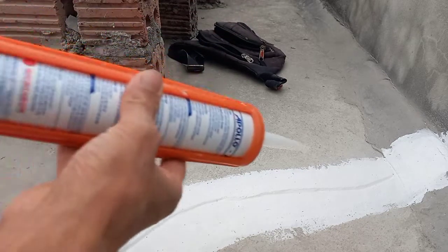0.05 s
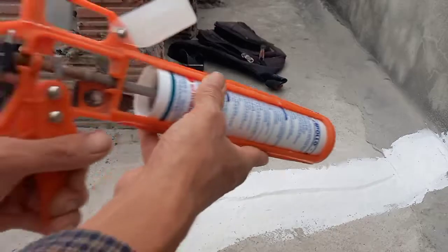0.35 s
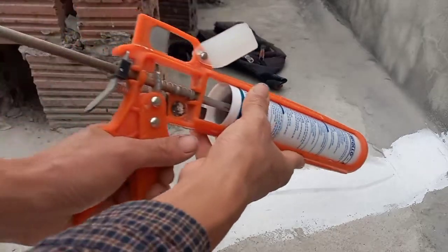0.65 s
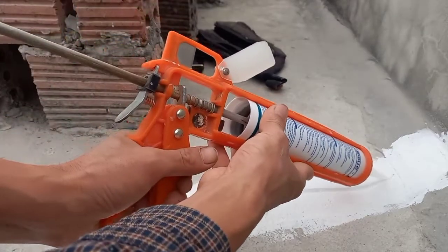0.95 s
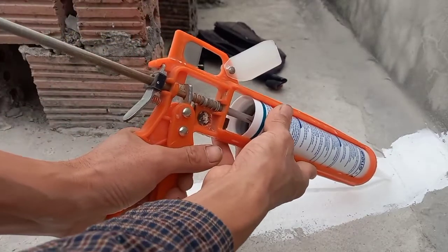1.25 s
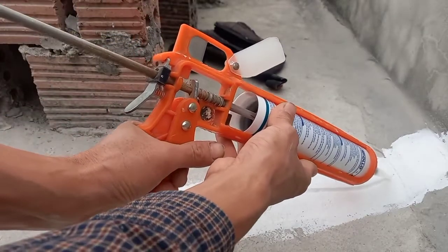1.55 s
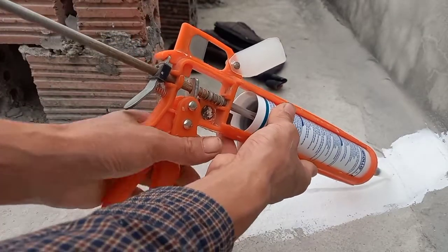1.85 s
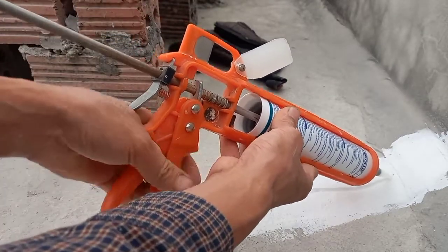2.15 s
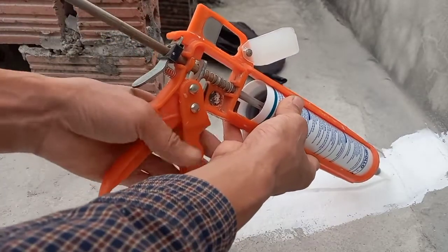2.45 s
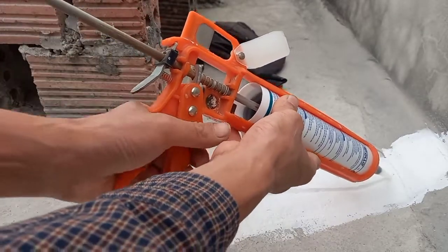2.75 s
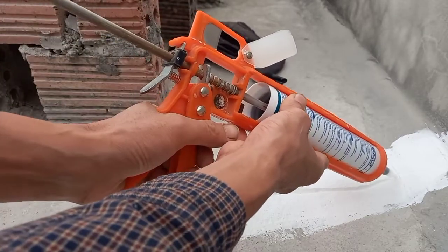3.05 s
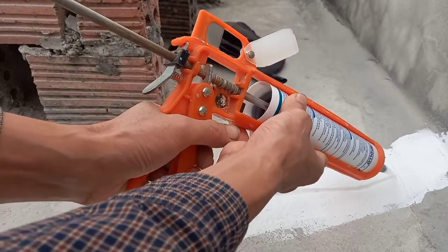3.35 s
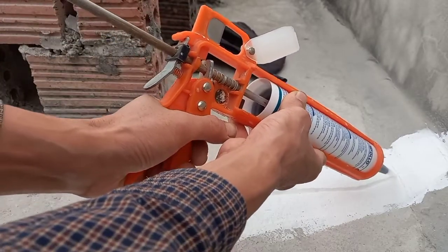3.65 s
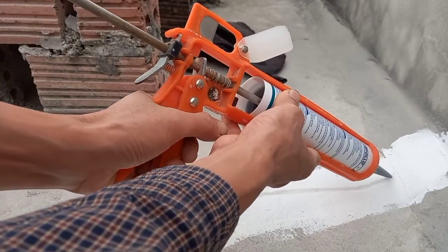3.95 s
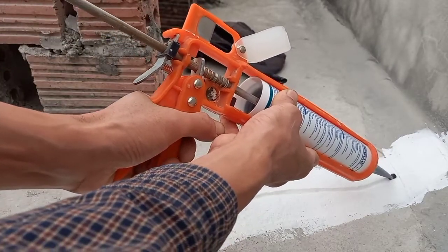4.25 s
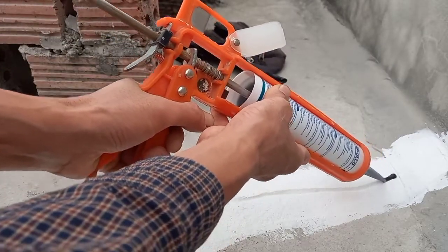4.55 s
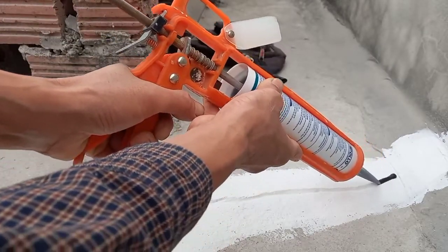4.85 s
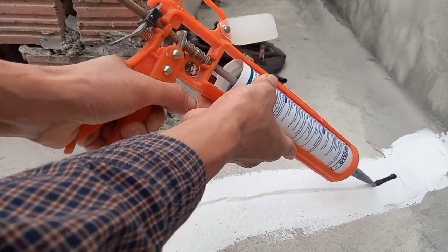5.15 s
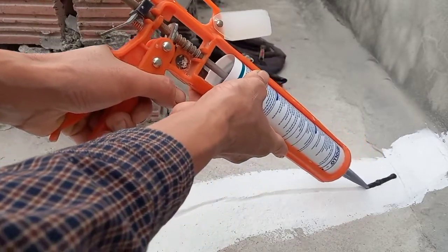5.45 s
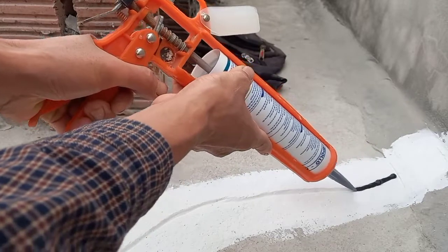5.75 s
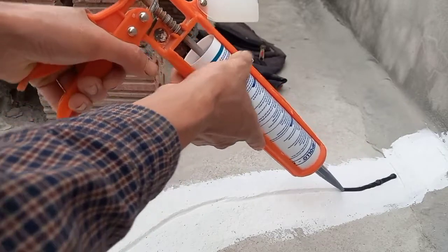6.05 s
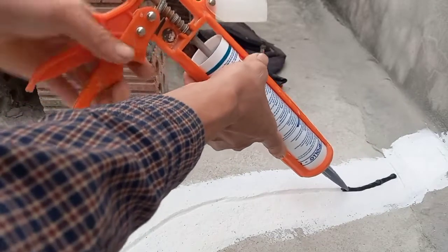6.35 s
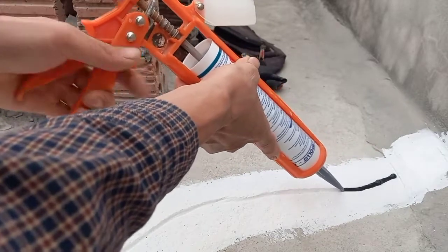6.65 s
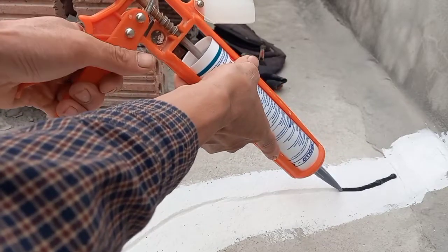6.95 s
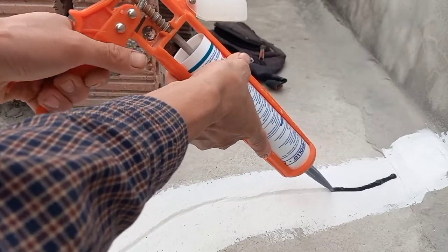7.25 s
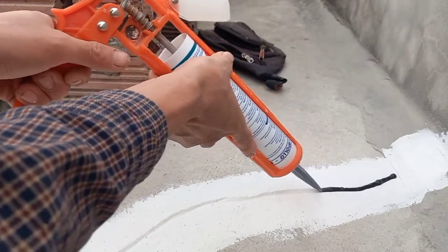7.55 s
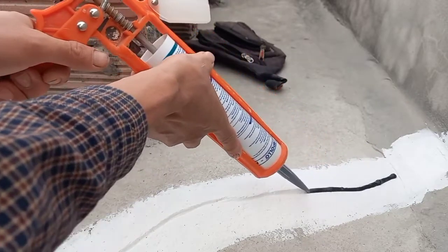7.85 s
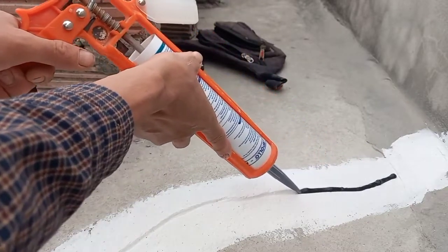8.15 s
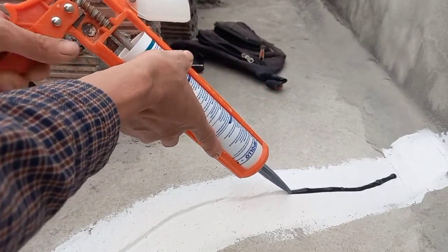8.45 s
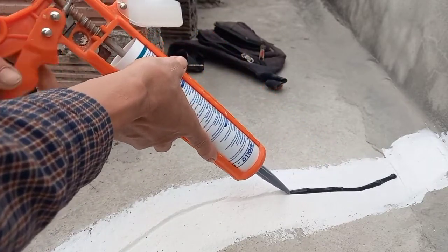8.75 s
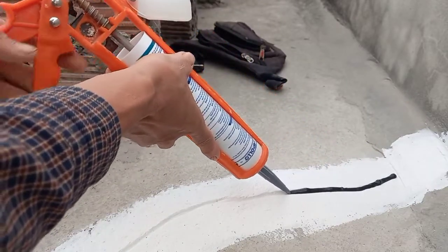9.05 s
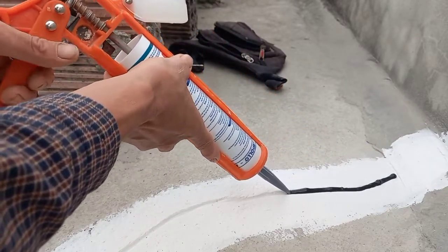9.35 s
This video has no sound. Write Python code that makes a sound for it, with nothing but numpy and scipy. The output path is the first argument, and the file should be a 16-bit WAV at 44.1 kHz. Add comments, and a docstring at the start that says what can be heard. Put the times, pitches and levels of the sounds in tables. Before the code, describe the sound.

Close up on an open rooftop, a caulking gun is squeezed and released, making scattered metal and plastic clicks, small spring ticks and light scrapes. A brief swish of cloth comes first, and two dull handling thuds fall early. The sharpest clicks arrive near the end. Underneath runs a continuous low rumble of distant traffic, where a booming engine grows louder, slows and picks up again.

```python
"""A sleeve swishes and a palm brushes a grip, over the rumble of traffic below a flat roof.
Then a caulking gun is worked at arm's length: impacts of its steel catch plate, rod and spring excite
the damped modes of the gun in its plastic frame, and sliding friction adds grit and hiss.
Down in the street one engine idles while another slows and picks up again; each sounds a series of
harmonics, and the moving one beats with its echo off a house front."""
import sys
import numpy as np
from scipy import signal
from scipy.fft import rfft, irfft, next_fast_len
from scipy.io import wavfile

SR = 44100
rng = np.random.default_rng(int(sys.argv[2]) if len(sys.argv) > 2 else 0)


def log_audio(samples):
    """Write samples as a 16-bit WAV file to the path given in sys.argv[1]."""
    # one column per channel
    frames = np.atleast_2d(samples).T
    # limit to full scale, then quantise
    limited = np.clip(frames, -1, 1)
    pcm = np.round(limited * 32767).astype(np.int16)
    wavfile.write(sys.argv[1], SR, pcm)


N = 418861
TIME = np.arange(N) / SR

# strength of the three traffic bands: time_s, rumble_db, roar_db, tyre_wash_db
TRAFFIC_LEVELS = [(0, -49, -54, -63), (.5, -46, -49.5, -59), (1.0, -46, -50, -63), (1.8, -44, -51, -57),
                  (2.6, -48, -50.5, -58.5), (3.2, -43, -49.5, -56.5), (3.55, -39, -47.5, -56),
                  (4.2, -42, -48.5, -53.5), (4.6, -35.5, -52.5, -53.5), (5.1, -34.5, -49.5, -54.5),
                  (5.5, -41.5, -51.5, -56), (5.9, -34, -53, -58), (6.3, -39, -50.5, -56),
                  (6.65, -43.5, -51, -56.5), (7.4, -38, -51.5, -58), (8.2, -40.5, -47, -55.5),
                  (9.0, -40.5, -47, -56.5), (9.5, -43, -49.5, -56.5)]
# spectrum of the street: frequency_hz, level_db
STREET_SPECTRUM = [(25, -5), (41, -9.5), (58, 3), (100, 0.5), (150, -9.5), (220, -10.5), (300, -15),
                   (365, -10.5), (490, -19), (640, -22), (860, -24.5), (1150, -29), (1580, -29),
                   (1830, -42), (2300, -41.5), (2600, -50.5), (5000, -71.5)]
# likeness of the street noise at the two ears: frequency_hz, coherence
EAR_COHERENCE = [(60, .99), (170, .975), (290, .8), (600, .36), (1400, .4), (3000, .1)]
# its phase difference between the ears: frequency_hz, left_lag_rad
EAR_PHASE = [(250, 0), (700, .25), (1200, 2.7), (2400, 6.2)]
# its level difference between the ears: frequency_hz, left_minus_right_db
EAR_LEVEL = [(60, 0), (200, 0), (380, -6.5), (500, 7), (640, 3), (880, 3), (1100, -0.5), (1500, 0),
             (1800, 4), (2300, 1.5), (2700, -7)]
# strength of the idling engine: time_s, level_db, upper_harmonics_relative_db
IDLE_LEVELS = [(0, -45.5, -7.5), (.3, -39, -7.5), (1.6, -38.5, -5), (2.7, -46.5, 4.5), (3.6, -39, 2),
               (6.3, -44.5, -0.5), (7.8, -50, 6), (9.5, -50.5, 5)]
# its upper harmonics: order, relative_db
IDLE_HARMONICS = [(3, -8), (4, -8), (5, -15.5), (6, -22), (9, -15.5), (10, -20)]
# speed of the moving engine: time_s, firing_rate_hz
FIRING_RATE = [(3, 55.53), (4.2, 58.34), (5, 54.15), (6.3, 50.05), (7, 46.05), (7.7, 44.66), (9.5, 48.98)]
# its exhaust boom: time_s, second_harmonic_db, third_harmonic_db
BOOM_LEVELS = [(0, -79, -75.5), (2.7, -44.5, -63), (3.35, -41, -44), (4.15, -41, -35), (4.4, -40.5, -53.5),
               (5.45, -40, -45), (6.05, -32.5, -35.5), (6.35, -33.5, -48), (6.7, -36.5, -39),
               (6.95, -37, -31.5), (7.25, -37.5, -37), (7.5, -26, -43.5), (7.65, -38, -30), (7.8, -40, -51),
               (7.95, -23, -29), (8.1, -28, -41.5), (8.3, -28.5, -33.5), (8.55, -27.5, -42),
               (8.85, -30.5, -36.5), (9.1, -36, -45.5), (9.3, -35.5, -50), (9.5, -30, -39.5)]
# partials of its rasp: order, relative_db
RASP_PARTIALS = [(1, -16), (2.5, -17.5), (3.5, -21.5), (4, -15.5), (4.5, -29), (5, -20), (6, -24.5),
                 (7, -30.5), (8, -31)]
# strength of that rasp: time_s, level_db
RASP_LEVELS = [(0, -72.5), (2.6, -49.5), (3.6, -48.5), (5, -38), (6.3, -34.5), (7.4, -36.5), (8.3, -35.5),
               (9.5, -43.5)]

# deep thuds as the gun is steadied: start_s, level_db, pitch_hz
HANDLING_THUDS = [(1.067, -25, 103), (2.513, -27.5, 71.7)]
# the sleeve brushing past: start_s, length_s, level_db
SLEEVE_STROKES = [(-.07, 0.18, -66), (.02, 0.82, -64), (.205, 0.17, -63.5)]
# spectrum of rubbing cloth: frequency_hz, level_db
CLOTH_SPECTRUM = [(500, -17), (1500, -11), (2500, -4.5), (3800, -0.5), (5300, 1), (6800, 2.5),
                  (7600, -10.5), (10000, -8), (13500, -12), (15500, -23)]
# the palm sliding onto the grip: start_s, length_s, level_db
PALM_STROKES = [(.3, 0.66, -68), (.48, 0.21, -57.5)]
# spectrum of rubbing skin: frequency_hz, level_db
PALM_SPECTRUM = [(500, 10.5), (1500, -2.5), (3200, -16), (5200, -1), (6700, -3), (7600, -14), (11000, -16),
                 (12100, -3), (12600, -6), (13200, -7), (14000, -6), (15500, -31)]
# the plunger sliding along the cartridge: start_s, length_s, level_db
PLUNGER_STROKES = [(2.09, 0.051, -64), (2.06, 0.32, -69), (3.75, 0.65, -78), (6.1, 0.91, -78.5),
                   (7.35, 1, -76.5), (8.4, 0.9, -72.5)]
# spectrum of its hiss: frequency_hz, level_db
PLUNGER_SPECTRUM = [(3000, -41), (4800, -2.5), (5500, -2), (6500, 3), (7400, -19), (15000, -20)]
# squeak of the trigger pivot: start_s, length_s, level_db, first_pitch_hz, last_pitch_hz
PIVOT_SQUEAKS = [(9.205, .028, -63, 4550, 5250)]
# the rod scraping through its plate, fingers shifting on the grip: start_s, length_s, relative_db
SCRAPE_STROKES = [(1.29, 0.17, -68.5), (2.262, 0.051, -47.5), (2.625, 0.1, -62.5), (3.03, 0.12, -74),
                  (3.254, 0.14, -69), (3.83, 0.35, -77.5), (6.05, 0.43, -71), (6.67, 0.11, -65.5),
                  (8.5, 0.12, -60), (8.62, 0.043, -56), (8.83, 0.048, -43), (9.17, .13, -64)]
# spring coils slipping over the rod: start_s, level_db, pitch_hz
COIL_SLIPS = [(3.0167, -57, 6330), (3.322, -58, 6300), (5.656, -65, 6100), (8.2224, -39, 5860),
              (8.712, -51, 6300), (8.892, -50, 6200), (9.356, -57, 5500), (9.368, -50, 5570)]
# rod and spring ringing on after harder blows: start_s, level_db, pitch_hz, t60_s
STEEL_RINGS = [(1.373, -77.5, 4190, 1.0), (1.5365, -59, 1949, .11), (1.5365, -66, 5469, .24),
               (2.2865, -55, 5450, .08), (2.3135, -52, 1620, .07), (6.552, -61, 5480, .15),
               (6.596, -53, 2546, .1), (6.596, -59, 2062, .22), (8.8464, -50, 2430, .08)]
# normal modes of the whole gun: frequency_hz, relative_db, t60_s
BODY_MODES = [(1510, -6, .05), (1625, 0, .075), (1945, -3, .075), (2070, -8, .07), (2260, -6, .055),
              (2400, -3, .05), (2540, -3, .06), (2680, -5, .04), (2870, -4, .045), (3100, -2, .05),
              (3400, -6, .05), (3960, -7, .04), (4300, -9, .04), (4950, -5, .035), (5300, -6, .03),
              (5460, -4, .055), (5750, -6, .03), (6350, -3, .03), (6650, -2, .035)]
# spectrum of a contact's crack: frequency_hz, level_db
CRACK_SPECTRUM = [(300, -30.5), (900, 0), (1600, 3.5), (3000, -2.5), (4300, -3), (5600, -1), (6800, 2.5),
                  (7700, -15), (10000, -13.5), (15500, -15.5)]
# impacts of trigger, catch plate and rod; the ring is weak while the hand grips hard:
# start_s, level_db, treble_over_mids_db, part_pitch_hz, part_over_crack_db, ring_over_crack_db
IMPACTS = [(1.3714, -45, -23, 1706, -8.5, -16), (1.374, -55.5, -13, 2480, -2, -20),
           (1.524, -39, -2, 2520, -4, 0), (1.532, -44.5, -6, 3060, -3, -11), (1.536, -40, 1, 1910, 1, -5),
           (1.8, -51, -17, 2360, -8, -14), (1.8068, -44, -14, 2290, -1, -5),
           (1.81, -46.5, -4, 2990, -3, -14), (1.834, -59, 3, 5500, -7, -13),
           (2.2582, -43, -9, 1310, -7, -7), (2.263, -39.5, 0, 5540, -2, -8),
           (2.269, -40.5, -9, 3300, -6, -5), (2.2738, -38.5, -11, 2920, -6, -7),
           (2.2795, -42, -4, 4350, -10, -7), (2.2854, -36, -4, 1600, -3.5, -6),
           (2.296, -52, -4, 1610, -3, -5), (2.3134, -41.5, -3, 2670, -8, -15),
           (2.6365, -55, -3, 3750, -14, -10), (3.0167, -64, 4, 3000, -11, -13),
           (3.287, -63, 2, 3000, -12, -13), (3.322, -69, 3, 3000, -13, -14),
           (3.8314, -42, -12, 1586, -3.5, -9.5), (3.833, -47, -7, 4340, -10, -11),
           (3.837, -51.5, -14, 1850, -3, -13), (4.782, -63.5, -13, 3470, -10, -11),
           (5.549, -65.5, -11, 3420, -9, -9), (6.5521, -40.5, -11.5, 1630, 2, -3),
           (6.5773, -43, -7, 3160, -1, -1), (6.579, -52, -16, 1650, 4, -4),
           (6.596, -50.5, -9.5, 1660, 0, -3.5), (8.5243, -51.5, -4.5, 1876, 0, -8),
           (8.53, -52.5, 3, 2680, -5, -8), (8.537, -47, -9, 1960, -7, -11),
           (8.62, -41.5, 3, 4170, -12.5, -9), (8.624, -50, -6, 3100, -7, -8),
           (8.629, -39.5, -17, 1610, -4, -9), (8.8166, -36.5, 0, 2290, -6, -5.5),
           (8.8269, -37.5, 1.5, 1546, 3, -3), (8.833, -43, 2, 3900, -3, -7), (8.84, -38, 9, 6360, -3, -8),
           (8.8466, -33.5, -4, 4920, -15, -8), (8.858, -36.5, 8.5, 6610, -6, -14),
           (8.862, -42, 4, 3370, -9, -10), (9.236, -52.5, -4, 1570, 4, -7)]

# bass response of the microphones: frequency_hz, gain_db
MIC_RESPONSE = [(20, -20.5), (38, -18), (47, -13.5), (57, -1.5), (70, -0.5)]
# spectrum of their self-noise: frequency_hz, level_db
MIC_HISS = [(2000, 11), (4000, 2.5), (5600, -1), (6300, 7.5), (6850, 5), (7400, -26.5), (9500, -8.5),
            (12000, -5), (15500, -5)]

GUN_PAN_DB, SLEEVE_PAN_DB, PALM_PAN_DB, ENGINE_PAN_DB = -1.1, 7, -4.5, -0.5  # left minus right
BOOM_FLUTTER = .24  # depth of fading of both engines' low harmonics
ATTACK = slice(0, SR // 200)  # the first 5 ms, which set the level of a click or tick


def undb(db):
    """Decibels to amplitude ratio."""
    return 10 ** (np.asarray(db) / 20)


def unit(x):
    """Scale to rms 1."""
    return x / np.sqrt(np.mean(x ** 2))


def curve(rows, column=1):
    """One column of a timed table, interpolated at every sample."""
    rows = np.array(rows)
    return np.interp(TIME, rows[:, 0], rows[:, column])


def at(points, hz):
    """Interpolate (frequency_hz, value) points on a log-frequency axis."""
    knots_hz, value = np.transpose(points)
    return np.interp(np.log(hz + 1), np.log(knots_hz), value)


def colour(x, spectrum):
    """Zero-phase filtering by (frequency_hz, gain_db) points."""
    size = next_fast_len(x.shape[-1])
    gain = undb(at(spectrum, np.fft.rfftfreq(size, 1 / SR)))
    return irfft(rfft(x, size) * gain, size)[..., :x.shape[-1]]


def noise(spectrum, size=N):
    """Coloured noise, incoherent between the ears."""
    return unit(colour(rng.standard_normal((2, size)), spectrum))


def walk(rate_hz):
    """Smooth random drift with a spread near 1."""
    knots = rng.standard_normal(4096)
    place = np.clip(TIME * rate_hz, 0, 4094)
    step = place.astype(int)
    part = place - step
    return knots[step] + (knots[step + 1] - knots[step]) * part * part * (3 - 2 * part)


def fade(t, t60_s):
    """Exponential decay, 60 dB in t60_s."""
    return np.exp(-np.log(1000) * t / t60_s)


def rise(t, rise_s):
    """Exponential approach to full amplitude."""
    return 1 - np.exp(-t / rise_s)


def pan(db):
    """Left and right gains for an interaural level difference."""
    return undb(np.array([[db], [-db]]) / 2)


def add(out, start_s, sound):
    """Superpose a sound at a time, which may be negative."""
    start = int(start_s * SR)
    sound = sound[:, max(-start, 0):N - start]
    start = max(start, 0)
    out[:, start:start + sound.shape[1]] += sound


def swells(strokes):
    """Envelope of rubbing: contact pressure rises and falls in one arch per stroke."""
    envelope = np.zeros((1, N))
    for start_s, length_s, level_db in strokes:
        add(envelope, start_s, undb(level_db) * np.sqrt(np.hanning(int(length_s * SR)))[None])
    return envelope


def traffic():
    """Partial coherence: the rumble is alike at both ears, road roar and tyre wash ever less so."""
    size = next_fast_len(N)
    hz = np.fft.rfftfreq(size, 1 / SR)
    coherence = at(EAR_COHERENCE, hz)
    street = rfft(rng.standard_normal((2, size))) * undb(at(STREET_SPECTRUM, hz))
    mid, side = street * np.sqrt([1 + coherence, 1 - coherence])
    lean = undb(at(EAR_LEVEL, hz) / 2)
    ears = np.array([(mid + side) * lean * np.exp(-1j * at(EAR_PHASE, hz)), (mid - side) / lean])
    deep, low = (1 / (1 + (hz / edge_hz) ** 8) for edge_hz in (190, 560))
    rumble, roar, wash = (unit(irfft(ears * band, size)[:, :N]) for band in (deep, low - deep, 1 - low))
    return (rumble * undb(curve(TRAFFIC_LEVELS, column=1) + 4 * walk(10))
            + roar * undb(curve(TRAFFIC_LEVELS, column=2) + .65 * walk(9.8))
            + wash * undb(curve(TRAFFIC_LEVELS, column=3) + walk(7.6)))


def harmonic(phase, order, flutter, fading_hz=7, judder_hz=34):
    """Multipath fading in the street and uneven firing modulate one engine partial."""
    fading = flutter * (walk(fading_hz) + 1j * walk(fading_hz))
    judder = .22 * np.sqrt(flutter * order) * (walk(judder_hz) + 1j * walk(judder_hz))
    ear_rad = order * np.array([[-.025], [.025]])
    angle = order * phase + rng.uniform(0, 2 * np.pi) + ear_rad
    return np.sqrt(2) * np.real((1 + fading + judder) * np.exp(1j * angle))


def beating(copy_db, null_s, period_s):
    """Interference: the gain of a tone plus a weaker copy, in antiphase at null_s and once a period."""
    copy = undb(copy_db)
    return np.abs(1 - copy * np.exp(2j * np.pi * (TIME - null_s) / period_s)) / np.sqrt(1 + copy ** 2)


def idling_engine(fundamental_hz=37.63, lope_db=-11):
    """Periodic firing makes a throb; unequal cylinders add a line half an order below the main one."""
    phase = 2 * np.pi * np.cumsum(fundamental_hz * (1 + .00815 * walk(4))) / SR
    throb = harmonic(phase, order=2, flutter=BOOM_FLUTTER)
    throb += undb(lope_db) * harmonic(phase, order=1.5, flutter=.22)
    throb *= beating(copy_db=-9, null_s=1.462, period_s=.406)
    upper = sum(undb(db) * harmonic(phase, order, flutter=.5) for order, db in IDLE_HARMONICS)
    upper *= undb(curve(IDLE_LEVELS, column=2)) * pan(ENGINE_PAN_DB)
    return undb(curve(IDLE_LEVELS)) * (throb + upper)


def moving_engine(hidden_echo_db=-4.5, clear_echo_db=-15, clear_s=7.2, jitter_rad=.55, jitter_hz=28):
    """Exhaust harmonics follow the firing rate; the boom interferes with its echo off a house front."""
    phase = 2 * np.pi * np.cumsum(curve(FIRING_RATE) * (1 + .007 * walk(9))) / SR
    # the echo counts for less once the vehicle comes into the clear
    in_clear = (1 + np.tanh((TIME - clear_s) / .025)) / 2
    echo_db = hidden_echo_db + in_clear * (clear_echo_db - hidden_echo_db)
    second = undb(curve(BOOM_LEVELS, column=1)) * harmonic(phase, order=2, flutter=BOOM_FLUTTER)
    third = undb(curve(BOOM_LEVELS, column=2)) * harmonic(phase, order=3, flutter=BOOM_FLUTTER)
    boom = (second + third) * beating(echo_db, null_s=6.58, period_s=.683)
    # uneven firing jitters the phase of the other partials
    rasp = sum(undb(db) * harmonic(phase + jitter_rad * walk(jitter_hz) / order, order, flutter=.97)
               for order, db in RASP_PARTIALS)
    return boom + undb(curve(RASP_LEVELS)) * rasp * pan(ENGINE_PAN_DB)


def roof_reflections(direct, tail_db=-9.5, t60_s=.27, size=16384):
    """Scattering from slab and parapet adds a faint, short tail to the direct sound."""
    t = TIME[:size]
    tail = noise([(500, -4.5), (2500, -2.5), (6000, -11), (14000, -.5)], size)
    tail *= fade(t, t60_s) * rise(t, .0014)
    tail /= np.sqrt(np.sum(tail ** 2) / 2)  # unit energy per ear
    return direct + undb(tail_db) * signal.fftconvolve(direct, tail, axes=1)[:, :N]


def thuds():
    """Damped low oscillations: dull bumps as the gun is steadied."""
    out, t = np.zeros((2, N)), TIME[:SR]
    envelope = rise(t, rise_s=.0089) * fade(t, t60_s=.31)
    for start_s, level_db, hz in HANDLING_THUDS:
        add(out, start_s, (undb(level_db) * envelope * np.sin(2 * np.pi * hz * t))[None])
    return out


def sleeve_and_palm(grain_db=1.5):
    """Friction noise: cloth fibres on the left and skin on the grip brush in a fine, uneven hiss."""
    rubs = ((SLEEVE_STROKES, CLOTH_SPECTRUM, SLEEVE_PAN_DB), (PALM_STROKES, PALM_SPECTRUM, PALM_PAN_DB))
    return sum(swells(strokes) * noise(spectrum) * pan(side_db) * undb(grain_db * walk(260))
               for strokes, spectrum, side_db in rubs)


def plunger():
    """Sliding friction along the cartridge hisses softly on each stroke."""
    return swells(PLUNGER_STROKES) * noise(PLUNGER_SPECTRUM)


def pivot_squeak():
    """Stick-slip motion of the trigger pivot gives a short rising chirp."""
    out = np.zeros((2, N))
    for start_s, length_s, level_db, first_hz, last_hz in PIVOT_SQUEAKS:
        size = int(length_s * SR)
        hz = np.linspace(first_hz, last_hz, size) * (1 + .015 * walk(400)[:size])
        chirp = np.hanning(size) * np.sin(2 * np.pi * np.cumsum(hz) / SR)
        add(out, start_s, undb(level_db) * chirp[None])
    return out


def body_ring(t, scatter_db=2):
    """Modal superposition: the gun answers one blow with a sum of damped sinusoids."""
    hz, db, t60_s = np.transpose(BODY_MODES)[:, :, None]
    hz = hz * (1 + .002 * rng.standard_normal(hz.shape))
    # each blow lands elsewhere, and each mode radiates differently to the two ears
    weight = undb(db + scatter_db * rng.standard_normal((2, *hz.shape)))
    phase = rng.uniform(0, 2 * np.pi, weight.shape)
    return (weight * fade(t, t60_s) * np.sin(2 * np.pi * hz * t + phase)).sum(axis=1)


def scrape(gain_db=-2, grit_db=3, ring_db=-8):
    """Forced vibration: gritty sliding keeps the modes of the gun ringing."""
    grit = swells(SCRAPE_STROKES) * undb(gain_db + grit_db * walk(450)) * noise(CRACK_SPECTRUM)
    ring = signal.fftconvolve(grit, body_ring(TIME[:4096]), axes=1)[:, :N]
    return grit + undb(ring_db) * grit.std() * unit(ring)


def spring_tick(level_db, hz, skirt_db=-20, size=2048):
    """A heavily damped resonance: a slipping coil gives a burst of noise centred on its pitch."""
    t = TIME[:size]
    spectrum = [(.3 * hz, skirt_db), (.57 * hz, skirt_db - 3.5), (.9 * hz, -6), (hz, 0),
                (1.12 * hz, -7), (1.2 * hz, skirt_db), (3.5 * hz, skirt_db - 15.5)]
    tick = noise(spectrum, size) * fade(t, t60_s=.013) * rise(t, rise_s=.00019)
    return undb(level_db) * tick / tick[:, ATTACK].std()


def steel_ring(level_db, hz, t60_s):
    """Free vibration: one mode of the rod or spring dies away after a blow."""
    t = TIME[:2 * SR]
    return undb(level_db) * fade(t, t60_s) * np.sin(2 * np.pi * hz * t + rng.normal(0, 1, (2, 1)))


def click(level_db, treble_db, part_hz, part_db, ring_db, size=8192):
    """Impact excitation: a broadband crack, the note of the part struck and the modes of the gun."""
    t = TIME[:size]
    ring = body_ring(t)
    # the loose part chatters as it rings: a random walk of phase roughens its note
    chatter_rad = .06 * np.cumsum(rng.standard_normal(size))
    part = fade(t, t60_s=.048) * np.sin(2 * np.pi * part_hz * t + chatter_rad + rng.normal(0, 1, (2, 1)))
    crack = noise(CRACK_SPECTRUM, size) * fade(t, t60_s=.021)
    layers = ((crack, 0), (ring, ring_db), (part, part_db))
    blow = sum(undb(db) * x / x[:, ATTACK].std() for x, db in layers) * rise(t, rise_s=.0009)
    # steel on steel is bright, steel on plastic dull
    mids, treble = (signal.sosfilt(signal.butter(4, 4200, kind, fs=SR, output="sos"), blow)
                    for kind in ("low", "high"))
    sound = mids / mids[:, ATTACK].std() + undb(treble_db) * treble / treble[:, ATTACK].std()
    return undb(level_db) * sound / sound[:, ATTACK].std()


def caulking_gun():
    """Impact and friction sounds superpose as the trigger is squeezed and released."""
    out = np.zeros((2, N))
    for events, source in ((IMPACTS, click), (COIL_SLIPS, spring_tick), (STEEL_RINGS, steel_ring)):
        for start_s, *settings in events:
            add(out, start_s, source(*settings))
    return out + scrape() + plunger() + pivot_squeak()


def scene():
    """Sound pressures add: gun, hand and sleeve close by, the street far below."""
    nearby = roof_reflections(caulking_gun() * pan(GUN_PAN_DB)) + thuds() + sleeve_and_palm()
    return nearby + moving_engine() + idling_engine() + traffic()


def record(dry, hiss_db=-70.5, top_hz=15600):
    """Band limiting: the microphones shed the deepest bass and add a faint hiss; the top is cut."""
    heard = colour(dry, MIC_RESPONSE) + undb(hiss_db) * noise(MIC_HISS)
    return signal.sosfilt(signal.ellip(10, .2, 80, top_hz, fs=SR, output="sos"), heard)


dry = scene()
out = record(dry)
log_audio(out)
```